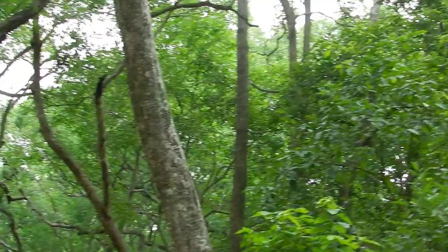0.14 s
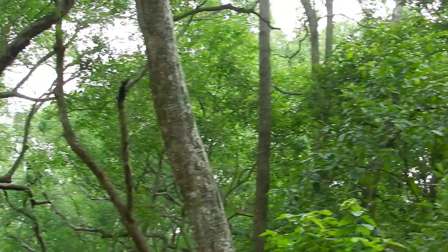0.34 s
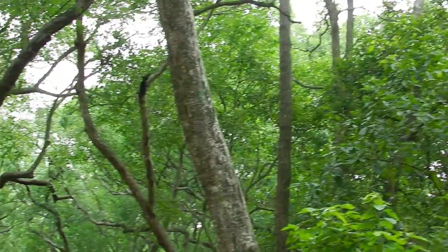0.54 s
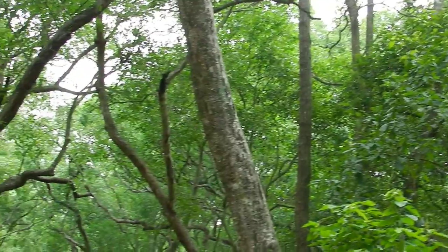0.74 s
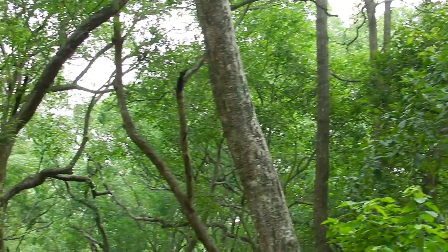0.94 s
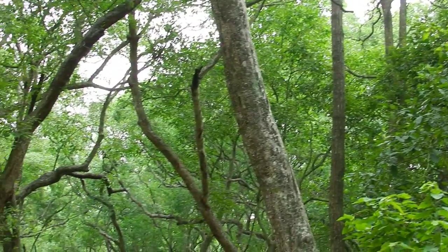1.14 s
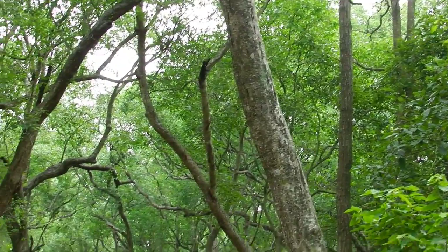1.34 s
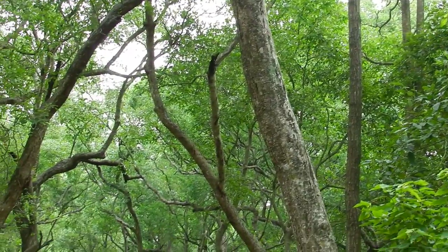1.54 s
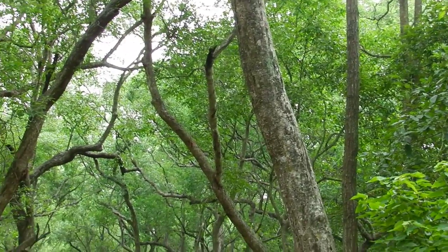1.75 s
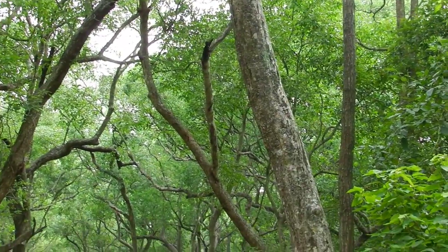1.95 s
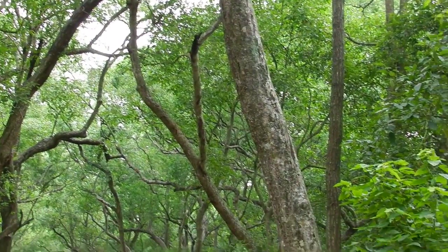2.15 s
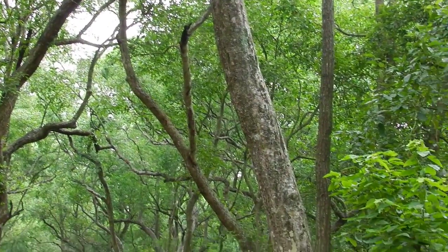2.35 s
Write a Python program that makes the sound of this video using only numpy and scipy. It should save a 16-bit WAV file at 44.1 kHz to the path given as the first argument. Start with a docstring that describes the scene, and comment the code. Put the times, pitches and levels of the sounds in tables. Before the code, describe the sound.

A distant deer gives one hoarse, echoing bark over cicadas and birds in a forest.

```python
"""A barking deer gives one hoarse bark, far off and a little to the right: ragged pulses and breath
ring its throat, and the wooded slopes smear the sound into a long echo. A bird whistles a few mostly
falling notes, a chorus trills near 3 kHz, and the clicking tymbals of cicadas merge into a hiss.
Leaves and distant air rustle beneath, and a hand-held camera takes some soft bumps."""
import sys
import numpy as np
from scipy import signal
from scipy.fft import rfft, irfft
from scipy.io import wavfile
from scipy.ndimage import uniform_filter1d

SR = 44100
rng = np.random.default_rng(int(sys.argv[2]) if len(sys.argv) > 2 else 0)


def materialize(psi):
    """Save the field psi as 16-bit PCM at rate SR to the path in sys.argv[1].

    A 1-D psi becomes a single channel; in a 2-D psi each row is a channel.
    """
    bounded = np.clip(np.atleast_2d(psi).T, -1, 1)
    quanta = np.round(bounded * 32767).astype(np.int16)
    wavfile.write(sys.argv[1], SR, quanta)


N = 110691

# The push behind the bark. Each row: time in seconds, relative level in dB.
BARK_EFFORT = [(1.615, -18), (1.66, -6), (1.73, -0.5), (1.83, 0), (1.93, -3.5), (2.02, -10.5),
               (2.07, -13.5), (2.15, -27)]
# The deer's throat resonances. Each row: centre in Hz, width in Hz, relative level in dB.
THROAT_RESONANCES = [(206, 270, -13), (635, 86, -0.5), (705, 120, 1), (820, 100, -2.5), (938, 105, -1.5),
                     (1080, 285, -1.5), (1220, 130, -0.5), (1440, 100, -7), (1626, 310, -2),
                     (1754, 270, -4), (2153, 245, -6), (2360, 100, -9.5), (2860, 570, -14.5),
                     (3740, 1600, -23.5)]
# The bark's clear tone, rising and falling with its echoes. Each row: time in seconds, level in dB.
BARK_TONE_LEVEL = [(1.63, -62.5), (1.68, -47.5), (1.71, -39.5), (1.775, -45), (1.80, -54), (1.835, -35),
                   (1.88, -44), (1.925, -37.5), (1.97, -59), (2.005, -34.5), (2.05, -69), (2.1, -52),
                   (2.145, -43), (2.245, -54), (2.295, -44), (2.34, -56.5), (2.51, -61)]
# The forest's reverb tail. Each row: frequency in Hz, time to fall 60 dB in seconds.
FOREST_DECAY = [(600, 2.8), (1000, 1.77), (1700, 1.57), (2400, 1.14), (4200, 1.67)]
# The bird's phrase. Each row: start in seconds, length in seconds, first and last pitch in Hz,
# level in dB, pan as left minus right in dB, relative echo send in dB.
BIRD_NOTES = [(0.578, 0.08, 3005, 2870, -50, -1.5, -4), (0.695, 0.064, 4050, 4070, -62, -6, 8.5),
              (0.75, 0.064, 4143, 4020, -56, -15, -6), (0.837, 0.0813, 3470, 3265, -57.5, -13, 7.5),
              (.92, 0.057, 3144, 3370, -65, -7, 6), (1.007, 0.1054, 3462, 3227, -59.5, -7, 2),
              (1.105, 0.077, 2610, 2350, -55, -6, -6.5), (1.21, .06, 2390, 2410, -65, -6, -7),
              (1.234, 0.046, 3770, 3235, -60, -9, 1.5), (1.255, 0.041, 3130, 2570, -57.5, -16, 2.5),
              (1.352, 0.091, 3120, 2926, -49.5, -6, -4), (2.02, 0.053, 4140, 3970, -56.5, -1, 0)]
# The cicadas' tymbal resonances. Each row: centre in Hz, width in Hz, relative level in dB.
TYMBAL_RESONANCES = [(4677, 350, -4), (5550, 1070, -2), (6220, 900, -8.5)]
# The swell of the cicadas. Each row: time in seconds, level in dB.
CICADA_SWELL = [(0, -48.5), (.35, -49), (.7, -50), (1.35, -49.5), (1.58, -47), (1.85, -48.5), (2.1, -48),
                (2.27, -47), (2.51, -51.5)]
# The colour of leaves, air and microphone hiss. Each row: frequency in Hz, relative density in dB.
BED_SPECTRUM = [(25, -36), (45, -20.5), (70, -4), (105, 0.5), (170, -5), (270, -6.5), (420, 2.5), (620, -4),
                (950, -7), (1600, -10), (2300, -15), (3600, -11), (7500, -16.5), (9000, -19.5),
                (12000, -17), (14200, -21), (15700, -25)]
# The bed's stereo image. Each row: frequency in Hz, left-right correlation, left minus right in dB.
BED_STEREO = [(80, 0.31, -1.5), (555, 0.14, -2), (1300, -0.14, 0), (3500, 0.28, -1.5), (6500, -0.042, 3),
              (9800, -0.24, 1), (15000, -0.002, 2.5)]
# Knocks on the camera. Each row: time of the peak in seconds, pitch in Hz,
# peak ahead of the low cut in dB, rise and decay time in seconds.
CAMERA_BUMPS = [(.343, 109, -35, 0.0015), (1.721, 93, -42, 0.0049), (1.829, 83, -40, 0.0083),
                (1.884, 115, -41, 0.0087), (1.929, 100, -41, .009), (1.999, 84.5, -47, .008),
                (2.136, 113, -47, .008), (2.177, 90, -46.5, 0.0071), (2.409, 80, -54, .009)]


def deer(rasp_hz=157.6, tone_hz=635, breath_db=-6.5, direct_db=-42, echo_db=-34):
    """Ragged pulses and puffs of breath ring the throat, heard mostly as echo; a clear tone rides on top."""
    beats, phase = pulses(rasp_hz, jitter=.16, scatter_db=5.5)
    breath = np.exp(-phase / 0.46) * rng.standard_normal(N)  # one puff per pulse
    drive = unit(beats) + undb(breath_db) * unit(breath)
    rasp = unit(resonate(drive, THROAT_RESONANCES)) * swell(BARK_EFFORT)
    pitch = tone_hz * (1 + 0.00495 * walk(25) + .015 * walk(205))
    tone = np.sqrt(2) * sine(pitch) * swell(BARK_TONE_LEVEL)
    echo = forest(rasp, likeness=.84)
    return (tone + undb(direct_db) * rasp + undb(echo_db) * echo) * pan(db=-4)


def forest(sound, likeness, build_s=0.01):
    """Dense scatter from trunks and slopes builds up, then dies away; the lows hang on longest."""
    t, t60 = seconds(), over_bins(FOREST_DECAY)
    scatter = rfft(pair(*rng.standard_normal((2, N)), likeness))
    decays = np.linspace(t60.min(), t60.max() + .01, 4)
    response = 0
    for decay, share in zip(decays, np.eye(len(decays))):
        band = irfft(scatter * np.interp(t60, decays, share), N)  # frequencies that ring about this long
        fade = (1 - np.exp(-t / build_s)) * np.exp(-np.log(1000) * t / decay)
        response = response + band * unit(fade) / np.sqrt(N)
    return signal.fftconvolve(sound[None], response, axes=1)[:, :N]


def bird(bend=2.23, waver=0.00916, flutter_db=2):
    """Pure whistles slide and settle, each hanging on among the trees."""
    direct, send = 0, 0
    for start, length, from_hz, to_hz, db, pan_db, echo_db in BIRD_NOTES:
        progress = np.clip((seconds() - start) / length, 0, 1)
        slide = to_hz + (from_hz - to_hz) * (1 - progress) ** bend
        whistle = np.sqrt(2) * sine(slide * (1 + waver * walk(145)))
        note = whistle * np.sin(np.pi * progress) * undb(db + flutter_db * walk(130))
        direct = direct + note * pan(pan_db)
        send = send + note * undb(echo_db)
    return direct + undb(5) * forest(send, likeness=0.16) * pan(db=-5)


def trill_chorus(callers=8, chirps_per_s=11.5, centre_hz=2969, sweep_hz=236, level_db=-55.5):
    """Distant callers repeat short falling chirps, out of step with each other."""
    voices = []
    for _ in range(callers):
        rate = chirps_per_s * (1 + .15 * walk(4.03))
        phase = (rng.random() + np.cumsum(rate) / SR) % 1
        pitch = centre_hz + sweep_hz * (.5 - phase) + 20 * walk(95.2)
        gate = np.minimum(4 * np.sin(np.pi * phase), 1)
        voices.append(sine(pitch) * gate * undb(2.2 * walk(41)))
    mid, side = unit(sum(voices[3:])), unit(sum(voices[:3]))
    return pair(mid, side, likeness=.75) * undb(level_db) * pan(db=-3)


def cicadas(clicks_per_s=22000, lag_s=18e-6):
    """Countless tymbal clicks merge into a ringing hiss that reaches the left ear first."""
    clicks = rng.standard_normal((2, N)) * (rng.random((2, N)) < clicks_per_s / SR)
    left, right = pair(*resonate(clicks, TYMBAL_RESONANCES), likeness=0.5)
    right = irfft(rfft(right) * np.exp(-2j * np.pi * bin_hz() * lag_s), N)
    return unit(np.array([left, right])) * curve(CICADA_SWELL) * undb(0.28 * walk(5.3))


def camera_bumps(low_cut_hz=58):
    """Dull thuds of a cycle or two travel through the camera body."""
    thuds = 0
    for when, hz, db, decay in CAMERA_BUMPS:
        age = seconds() - when
        thuds = thuds + undb(db) * np.cos(2 * np.pi * hz * age) * np.exp(-np.abs(age) / decay)
    low_cut = signal.butter(4, low_cut_hz, "high", fs=SR, output="sos")
    return signal.sosfilt(low_cut, thuds) * pan(db=1.5)


def leaves_and_air(level_db=-50.5):
    """A wide, soft bed of rustling leaves and distant air, with microphone hiss on top."""
    spectrum = pair(*rfft(rng.standard_normal((2, N))), likeness=over_bins(BED_STEREO))
    balance = pan(over_bins(BED_STEREO, column=2))
    rustle = irfft(spectrum * undb(over_bins(BED_SPECTRUM)) * balance, N)
    return unit(rustle) * undb(level_db + 0.62 * walk(1))


def pulses(rate, jitter, scatter_db):
    """Pulses uneven in timing and strength, and the phase of their cycle."""
    cycles = np.cumsum(rate * np.exp(jitter * walk(rate))) / SR
    onsets = np.diff(np.floor(cycles), prepend=0)
    return onsets * undb(scatter_db * rng.standard_normal(N)), cycles % 1


def resonate(x, rows):
    """Ring a sound through steep resonances, summed in power."""
    f = bin_hz() + 1
    gains = (undb(db) / (1 + ((f * f - hz * hz) / (f * width)) ** 2) for hz, width, db in rows)
    return irfft(rfft(x) * np.sqrt(sum(gain ** 2 for gain in gains)), N)


def sine(hz):
    """An oscillator that follows a moving pitch."""
    return np.sin(2 * np.pi * np.cumsum(hz) / SR)


def walk(rate):
    """Smooth random drift with an rms of 1."""
    span = max(int(SR / rate), 2)
    drift = uniform_filter1d(rng.standard_normal(N), span, mode="wrap")
    return unit(uniform_filter1d(drift, span, mode="wrap"))


def pan(db):
    """Left and right gains; positive dB leans left."""
    return undb(np.array([db, -db]).reshape(2, -1) / 2)


def pair(a, b, likeness):
    """Left and right from two unrelated signals, with likeness as their correlation."""
    likeness = np.clip(likeness, -.98, .98)
    mid, side = a * np.sqrt((1 + likeness) / 2), b * np.sqrt((1 - likeness) / 2)
    return np.array([mid + side, mid - side])


def curve(rows):
    """A fader ride through points of time and dB."""
    return undb(np.interp(seconds(), *np.array(rows).T))


def swell(rows):
    """A fader ride, silent before its first point."""
    return curve(rows) * (seconds() > rows[0][0])


def over_bins(rows, column=1):
    """One column of a table, read at every frequency bin on a log axis."""
    rows = np.array(rows)
    return np.interp(np.log(bin_hz() + 1), np.log(rows[:, 0]), rows[:, column])


def bin_hz():
    """Frequency of every bin."""
    return np.arange(N // 2 + 1) * SR / N


def seconds():
    """Time of every sample."""
    return np.arange(N) / SR


def undb(db):
    """Decibels to gain."""
    return 10 ** (np.asarray(db) / 20)


def unit(x):
    """Scale to an rms of 1."""
    return x / np.sqrt(np.mean(x ** 2) + 1e-20)


def scene():
    """The stereo mix: the deer over the life of the forest."""
    return deer() + bird() + trill_chorus() + cicadas() + leaves_and_air() + camera_bumps()


def record(dry):
    """The camera cuts the top end steeply."""
    top_hz = 15700
    return signal.sosfilt(signal.ellip(10, .2, 70, top_hz, fs=SR, output="sos"), dry)


dry = scene()
out = record(dry)
materialize(out)
```